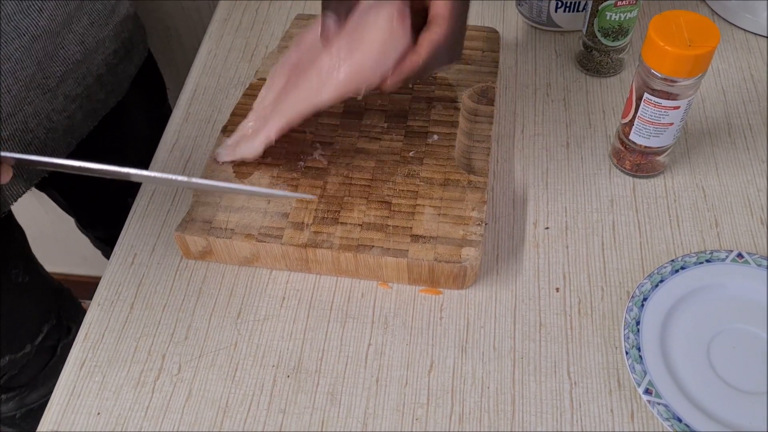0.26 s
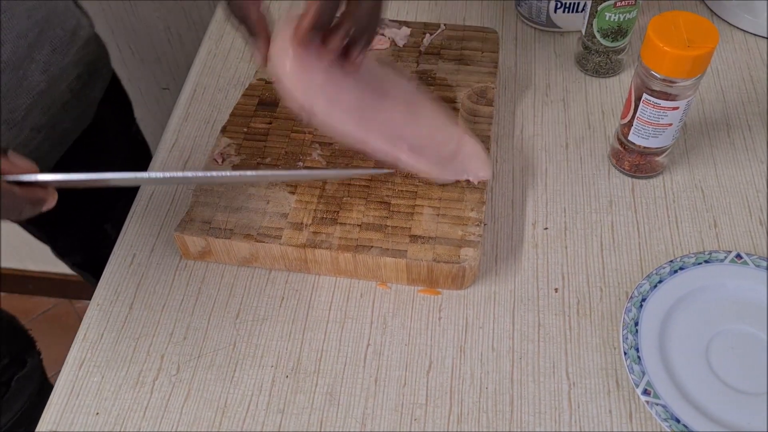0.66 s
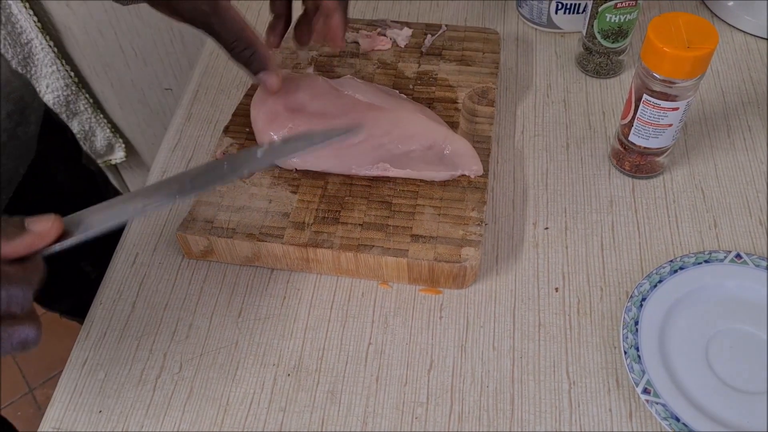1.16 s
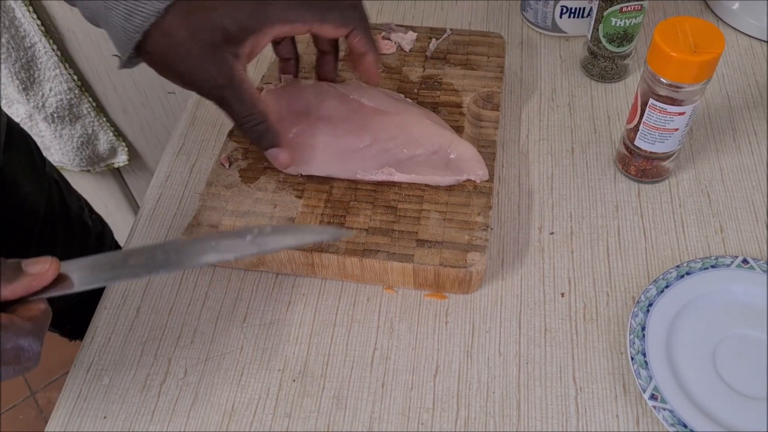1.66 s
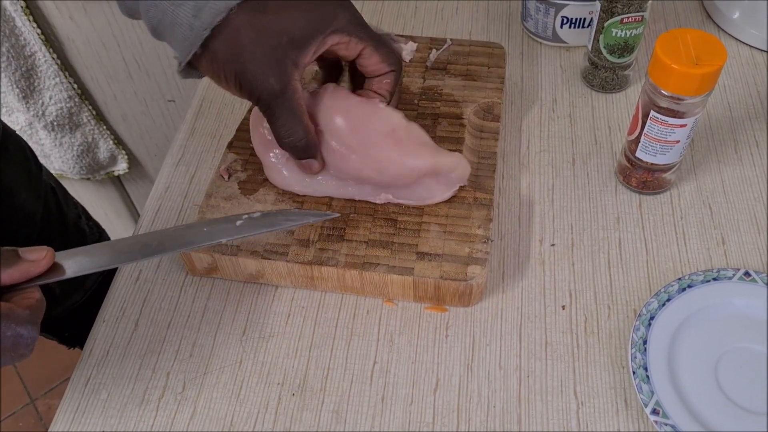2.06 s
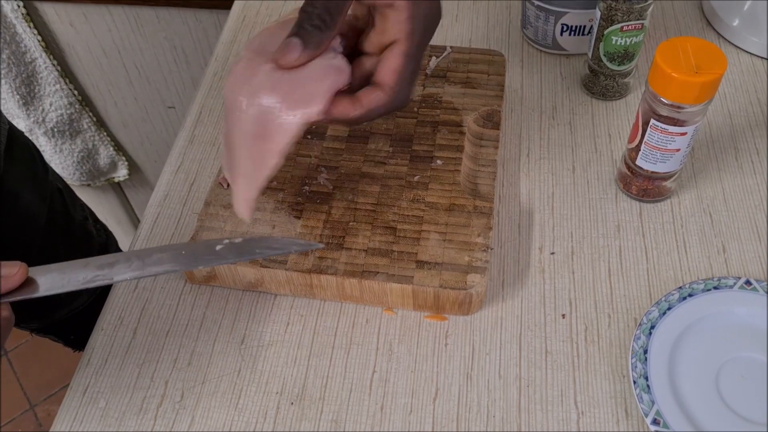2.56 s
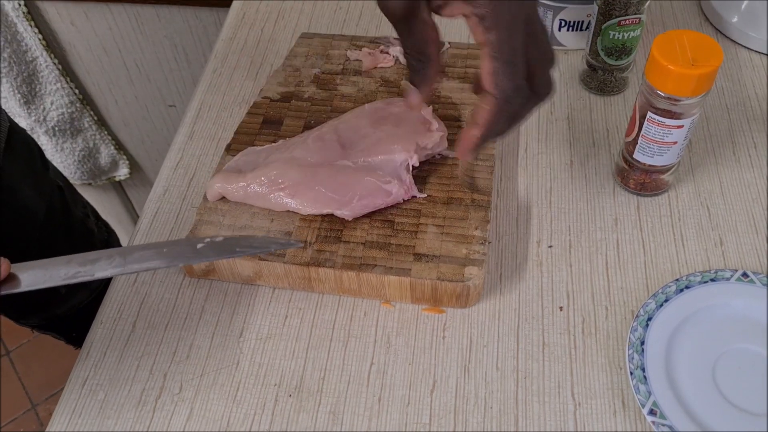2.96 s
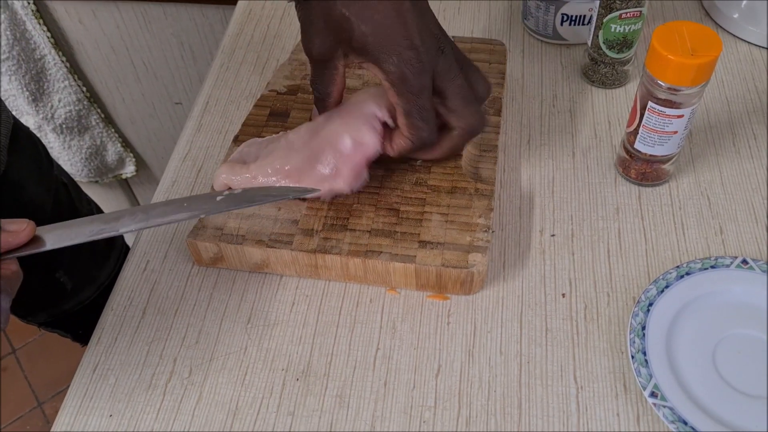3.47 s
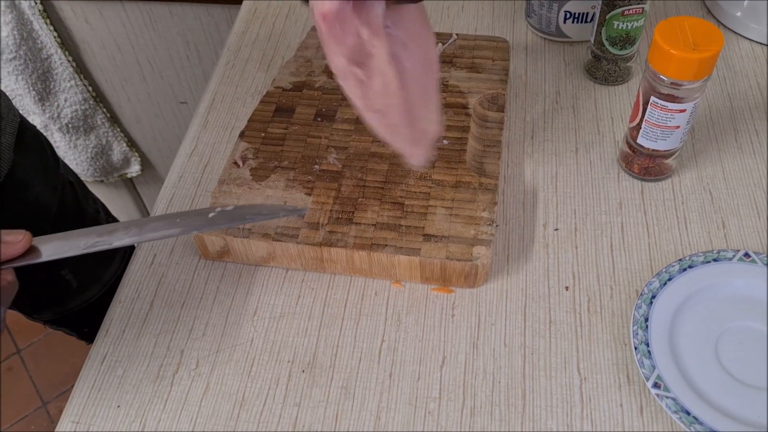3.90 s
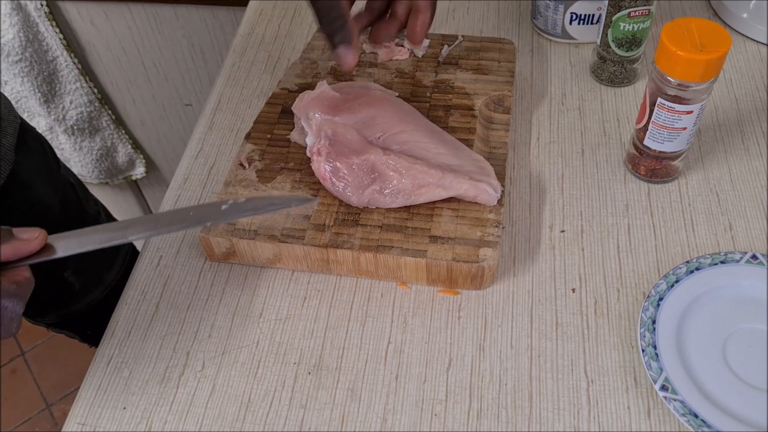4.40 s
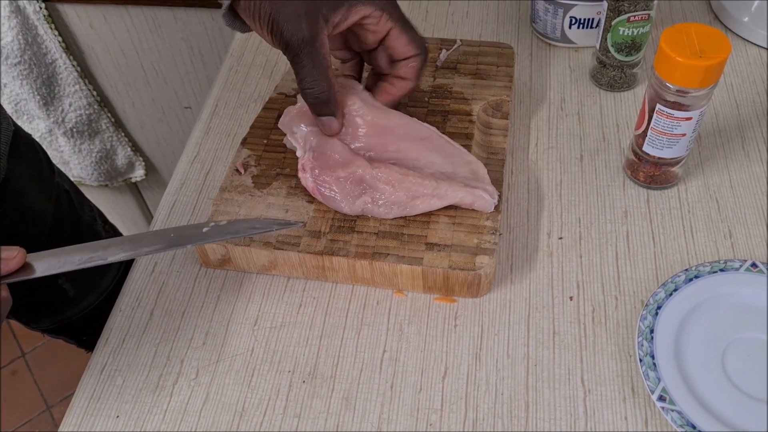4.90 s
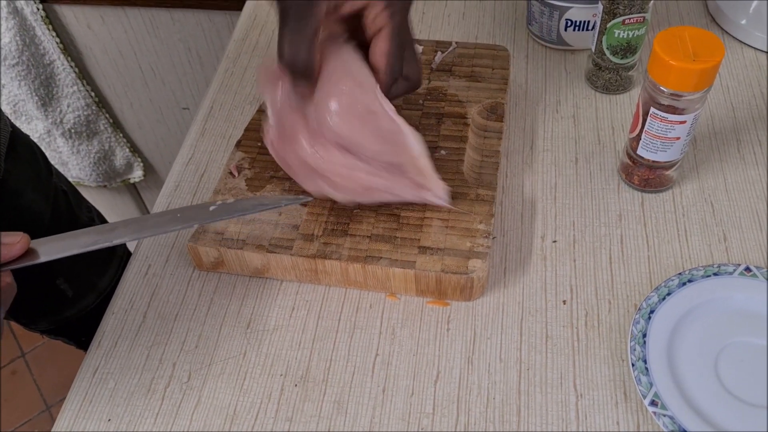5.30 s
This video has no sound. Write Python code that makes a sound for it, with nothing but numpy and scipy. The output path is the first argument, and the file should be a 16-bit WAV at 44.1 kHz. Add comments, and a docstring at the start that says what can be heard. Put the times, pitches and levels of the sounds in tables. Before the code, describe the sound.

A small kitchen with hard walls, heard close to a wooden board in stereo, over a faint low rumble and slight hiss. From 0 to 0.25 s raw chicken peels up with thin sticky crackles; a sleeve rustles softly until about 0.7 s, when the meat flops down with a small wet pat and a soft low table thud. At 1.06 s a knife gives a light dry tick, with fainter touches near 1.5 and 2.5 s. Wet films snap delicately around 1.9 to 2.8 s, with a muted bump near 2.84 s. Sticky crackling gathers from 3.3 to 3.7 s. At 4.06 s comes the one loud event: a hard, wet, popping slap with splashy spatter, woody knock, faint crockery ring, brief room reflection and a deep beating boom fading in under half a second. Afterwards there is a faint bump at 4.57 s, then tiny sticky clicks near 4.7 and 5.25 s.

```python
"""Raw chicken on a cutting board

Small kitchen, two microphones close to a wooden board where a raw chicken breast is turned over.
Wet films peel and snap in sticky noise bursts; the meat flops back as popping air, splashes and damped wood modes.
One hard slap rings the board and sets two beating table modes booming.
Around it cloth brushes, a knife ticks lightly, hard walls reflect and low filtered noise fills the room."""
import sys
import numpy as np
from scipy import signal
from scipy.fft import rfft, irfft, next_fast_len
from scipy.io import wavfile

SR = 44100
rng = np.random.default_rng(int(sys.argv[2]) if len(sys.argv) > 2 else 0)


def transcribe(signal):
    """Save signal, clipped to [-1, 1], as a 16-bit WAV file at the path in sys.argv[1]."""
    frames = np.atleast_2d(signal).T
    limited = np.clip(frames, -1, 1)
    pcm = np.round(limited * 32767).astype(np.int16)
    wavfile.write(sys.argv[1], SR, pcm)


N = 244660  # length [samples]
TOP_HZ = 16000  # upper edge of everything recorded


def amp(db):
    """Decibels to gain."""
    return 10 ** (np.asarray(db) / 20)


def seconds(length):
    """Time axis of a given length [s]."""
    return np.arange(int(length * SR)) / SR


def read(table, hz):
    """Value of a spectrum table on a log-frequency axis."""
    f, value = np.transpose(table)
    return np.interp(np.log(hz + 1), np.log(f), value)


def colour(x, table, tilt_db=0, tilt_from_hz=500):
    """Shape a sound by a spectrum and a tilt per octave; white noise keeps its power."""
    size = next_fast_len(x.shape[-1] + 2048)
    hz = np.arange(size // 2 + 1) * SR / size
    level_db = read(table, hz) + tilt_db * np.log2(hz + tilt_from_hz)
    gain = amp(level_db) / (1 + (hz / TOP_HZ) ** 20)
    gain_rms = np.sqrt(np.mean(gain ** 2))
    return irfft(rfft(x, size) * gain / gain_rms, size)[..., :x.shape[-1]]


def add(out, s, x):
    """Mix a sound in at a time [s]."""
    i = max(int(s * SR), 0)
    out[i:i + len(x)] += x[:len(out) - i]


def ring(t, hz, t60):
    """One damped mode, 60 dB down after t60 [s]."""
    return np.sin(2 * np.pi * hz * t) * amp(-60 * t / t60)


def modes(t, table):
    """Damped modes struck together, alternating in sign."""
    return sum((-1) ** k * amp(db) * ring(t, hz, t60) for k, (hz, db, t60) in enumerate(table))


def wander(count, points):
    """Random values joined by straight lines."""
    return np.interp(np.arange(count), np.linspace(0, count, num=points), rng.standard_normal(points))


def diffuse(count, apart_hz):
    """Stereo noise that is alike in the bass and unrelated in the treble."""
    mid, side = rfft(rng.standard_normal((2, count)))
    hz = np.arange(len(mid)) * SR / count
    alike = 1 / (1 + (hz / apart_hz) ** 2)
    sides = np.array([[1], [-1]]) * side * np.sqrt(1 - alike)
    return irfft(mid * np.sqrt(1 + alike) + sides, count) / np.sqrt(2)


# Wooden board lying on the table: (frequency [Hz], relative level [dB], decay by 60 dB [s])
BOARD_MODES = [(84.5, 2.5, 0.2), (116.1, -6, 0.18), (168, -3.5, .26), (197, -4.5, 0.19),
               (221.6, -2.5, 0.09), (281, -5, 0.22), (680, -13, .04), (835, 0, 0.05), (373, -20.5, 0.3),
               (1047, -6.5, 0.039), (1228, -6.5, 0.076), (1427, 5, .025), (1650, 2, 0.022),
               (2150, -1, .025), (2540, 2.5, 0.042), (2860, -3, 0.025), (3900, -14, 0.019)]


def board(t):
    """Damped modes of the wood after a sharp blow."""
    return modes(t, BOARD_MODES)


# Meat landing on the board:
# (time [s], level [dB], starting pop pitch [Hz], relative board level [dB], splash tilt [dB per octave])
SLAPS = [(0.7064, -32, 2410, -6, 2), (0.7167, -29, 1980, -10, 3.5), (0.7224, -34.5, 2210, -4, -2),
         (4.0621, -3, 1946, -5, -1), (4.0663, -14.5, 2730, -16, -1), (4.0698, -11, 1060, -4.5, -9),
         (4.081, -20.5, 1200, -6.5, -3.5)]
# Spectrum of the juice splash: (frequency [Hz], relative level [dB])
SPLASH_SPECTRUM = [(200, -14.5), (520, -16), (750, 2.5), (1100, 1.5), (1600, 0), (2400, 5), (3200, 3),
                   (3900, -4), (5000, 0.5), (6400, -7.5), (8000, -23), (10000, -22.5), (13000, -11.5),
                   (16000, -18)]
# Plate and jars on the table, ringing on: (frequency [Hz], relative level [dB], decay by 60 dB [s])
CROCKERY_MODES = [(831, -1, .25), (887, -5, .25), (1014, -7, .3), (1085, -6, .3), (1176, -3, .33),
                  (1365, -4, .28), (1467, -3, .33), (1617, 3, .3), (1780, 0, .25), (2735, -6, .22)]


def slaps(splash_s=0.0034, smear_s=0.018, smear_db=-13, splash_db=-5.0, board_db=-13,
          crockery_db=-32, pop_db=0.5, pop_t60_s=0.025, sag=0.13, sag_s=0.0075):
    """Trapped air pops and sags in pitch, wood and crockery ring, juice spatters.

    Gives the near sound and the crack sent to the walls."""
    near, crack, t = np.zeros(N), np.zeros(N), seconds(.4)
    wood = amp(board_db) * board(t) + amp(crockery_db) * modes(t, CROCKERY_MODES)
    attack = 1 - np.exp(-t / .0003)
    # the pop slows from its starting pitch to a share (1 - sag) of it
    sagging = t * (1 - sag) + sag * sag_s * (1 - np.exp(-t / sag_s))
    sheet = amp(splash_db) * np.exp(-t / splash_s)
    drops = amp(splash_db + smear_db) * np.exp(-t / smear_s)
    centre = len(t) // 2
    impulse = signal.unit_impulse(len(t), centre)
    for s, db, hz, wood_db, tilt_db in SLAPS:
        hiss, spatter = rng.standard_normal((2, len(t)))
        # cubing the noise leaves sparse, strong drops
        splash = colour(hiss * sheet + spatter ** 3 / 4 * drops, SPLASH_SPECTRUM, tilt_db)
        pop = amp(pop_db) * ring(sagging, hz, pop_t60_s)
        add(near, s, amp(db) * (pop + amp(wood_db) * wood + splash) * attack)
        # summed over all directions the splash is one even crack of the same energy
        even = np.linalg.norm(sheet + drops) * colour(impulse, SPLASH_SPECTRUM, tilt_db)
        add(crack, s - t[centre], amp(db) * even)
    return near, crack


# Weight settling on the board:
# (time [s], relative table boom [dB], relative board thump [dB], relative soft pat [dB], contact [s])
THUDS = [(.734, -52, -39.5, -38.5, 0.0057), (0.757, -18, -32, -76, 0.0053),
         (1.05, -44, -52.5, -47.5, 0.0037), (1.809, -40, -73, -72, 0.009),
         (2.113, -46.5, -49.5, -73, 0.0062), (2.765, -44, -52.5, -64, 0.0018),
         (2.838, -26, -44, -48, 0.0046), (2.847, -28.5, -48, -62, 0.007), (3.476, -54, -46.5, -52, 0.0046),
         (4.066, -7, -12, -25, 0.0027), (4.572, -36, -40.5, -78, 0.0071)]
# Spectrum of soft flesh on wood: (frequency [Hz], relative level [dB])
FLESH_SPECTRUM = [(80, -5.5), (200, -3), (350, 1), (540, 2), (800, -23.5), (1500, -21.5), (4000, -47),
                  (12000, -63)]


def thuds(thump_db=-6, pat_db=-4, pat_s=0.024):
    """The soft weight pats the wood; its smooth push mostly drives the low board modes."""
    out, t = np.zeros(N), seconds(.4)
    wood = amp(thump_db) * board(t)
    for s, _, wood_db, flesh_db, contact in THUDS:
        push = np.sin(np.pi * np.minimum(t / contact, 1)) ** 2
        thump = signal.fftconvolve(wood, push / push.sum())[:len(t)]
        pat = colour(rng.standard_normal(len(t)), FLESH_SPECTRUM)
        pat *= np.exp(-t / pat_s) * (1 - np.exp(-t / contact))
        add(out, s, amp(wood_db) * thump + amp(flesh_db + pat_db) * pat)
    return out


def table_boom(low_hz=47.56, high_hz=55.8, t60=0.36, boom_db=-4, rise_s=0.02, lag_s=.007):
    """Two close modes of the table swell and beat after each push of THUDS."""
    out, t = np.zeros(N), seconds(0.87)
    beating = ring(t, low_hz, t60) - ring(t, high_hz, t60)
    boom = amp(boom_db) * beating * (1 - np.exp(-t / rise_s))
    for s, db, *_ in THUDS:
        # the table gives way a little after the push
        add(out, s + lag_s, amp(db) * boom)
    return out


# Flesh pressed down: (time [s], level [dB], starting pitch [Hz], nominal decay by 60 dB [s])
BUMPS = [(.736, -35.5, 205.5, 0.09), (1.051, -39, 538, 0.047), (4.072, -16.5, 219.3, 0.057),
         (4.5707, -32.5, 197.5, 0.071)]


def bumps(attack_s=0.0028, sag_per_s=3.5):
    """Round, hollow bumps whose pitch sinks as the flesh spreads."""
    out, t = np.zeros(N), seconds(.15)
    sinking = np.log1p(sag_per_s * t) / sag_per_s
    for s, db, hz, t60 in BUMPS:
        add(out, s, amp(db) * ring(sinking, hz, t60) * (1 - np.exp(-t / attack_s)))
    return out


# Meat peeling off or spreading on the wood:
# (full strength time [s], build-up [s], release [s], relative level [dB], tilt [dB per octave])
PEELS = [(0.195, 0.22, 0.044, -59, 5), (.720, 0.033, 0.021, -40.5, -4.5), (1.925, 0.051, 0.059, -55, -0.5),
         (2.284, 0.03, 0.017, -52, 5), (3.36, 0.17, 0.18, -74, -2), (3.505, 0.06, 0.047, -55.5, 0),
         (3.662, .065, 0.024, -52, 4), (4.06, 0.018, .008, -36.5, -6.5), (4.685, 0.062, 0.051, -63, 0),
         (5.275, 0.13, 0.018, -58.5, 1.5)]
# Spectrum of wet films, for peels and snaps alike: (frequency [Hz], relative level [dB])
WET_SPECTRUM = [(300, -20.5), (1000, -10.5), (2000, -2.5), (3200, 0.5), (4500, 0.5), (5600, 5.5),
                (7300, 3.5), (9000, -10.5), (12500, -5), (16000, 0)]


def peeling(cycles=6, fits_db=2, peel_db=0, curve=1.3, grain_spread_db=3.2):
    """Dense tiny threads and bubbles burst, each a few cycles at its own pitch; the pull builds, then dies."""
    out, t = np.zeros(N), seconds(.002)
    for peak, build, release, db, tilt_db in PEELS:
        when, pitch, size = rng.random((3500, 3)).T[:, :, None]
        hz = 1200 + 14000 * pitch
        strength = amp(-grain_spread_db * np.log(size + 0.005)) * np.sqrt(hz)
        grains = strength * ring(t, hz, cycles / hz)
        # the bursts are scattered over 0.45 s
        places = (when * .45 * SR).astype(int) + np.arange(len(t))
        crackle = np.bincount(places.ravel(), grains.ravel())
        crackle = (crackle - crackle.mean()) / crackle.std()
        age = np.arange(len(crackle)) / SR
        grip = np.minimum(age / build, 1) ** curve * np.exp(-np.maximum(age - build, 0) / release)
        # the film lets go in fits
        grip *= amp(fits_db * wander(len(grip), 60))
        add(out, peak - build, amp(db + peel_db) * colour(crackle, WET_SPECTRUM, tilt_db) * grip)
    return out


# The largest wet films snapping:
# (time [s], relative level [dB], tilt [dB per octave], bubble pitch [Hz], decay to 1/e [s])
SNAPS = [(0.038, -54.5, 3, 7300, 0.0039), (.117, -70, 5, 6300, 0.0052), (0.181, -45, 10, 6670, 0.0091),
         (0.245, -47.5, -1.5, 5890, 0.005), (0.7004, -34, -3, 6900, 0.0018), (1.104, -52, -4, 8000, 0.0046),
         (1.890, -50, -5, 6100, .003), (1.915, -37.5, 0.5, 4800, 0.0071),
         (1.922, -40.5, -0.5, 5870, 0.0051), (2.083, -51, 0.5, 5130, 0.0082),
         (2.115, -43, 11, 9900, 0.0057), (2.2604, -48.5, -1.5, 5920, 0.0063),
         (2.2904, -41, 3, 4830, 0.0038), (2.456, -36.5, 16, 11100, 0.0017), (2.5904, -58, -2, 7300, 0.0058),
         (2.7654, -47, -2.5, 6670, 0.0052), (2.839, -50.5, -2.5, 5870, 0.0048),
         (3.289, -58, -1, 6430, 0.003), (3.3236, -54.5, -6.5, 5840, 0.0061), (3.35, -67, -13, 5570, 0.0046),
         (3.392, -58.5, -3, 5200, .005), (3.475, -44, 3, 6500, .002), (3.491, -34.5, 6.5, 5600, .003),
         (3.521, -45, 1, 7200, .002), (3.5264, -44, 6, 7040, 0.0037), (3.5707, -47, 4, 6450, 0.0023),
         (3.592, -47.5, -1.5, 5700, 0.0039), (3.6177, -39, 11, 6990, 0.0022), (3.655, -43, 12, 6370, 0.004),
         (3.66, -36.5, 8, 5960, .003), (4.6262, -47, -3.5, 5960, 0.0045), (4.6754, -46.5, 4, 6000, 0.005),
         (4.715, -54.5, -1, 7000, 0.0077), (5.224, -49, 13, 6500, 0.0056), (5.2691, -50, 7, 6040, 0.013)]


def snaps(after_s=0.0093, after_db=-13, snap_db=-2.0, rise_s=0.00048, bubble_db=-9):
    """Each film breaks with a noise tick, a tiny bubble of its own pitch and smaller ticks behind it."""
    out, t = np.zeros(N), seconds(.06)
    rise = 1 - np.exp(-t / rise_s)
    for s, db, tilt_db, hz, decay in SNAPS:
        tick, after = rng.standard_normal((2, len(t)))
        bubble = amp(bubble_db) * np.sin(2 * np.pi * hz * t)
        burst = (tick + bubble) * np.exp(-t / decay)
        after_ticks = after * np.abs(after) / 2 * np.exp(-t / min(after_s, 2 * decay))
        burst += amp(after_db) * after_ticks
        add(out, s, amp(db + snap_db) * colour(burst * rise, WET_SPECTRUM, tilt_db))
    return out


# Light touches of the knife: (time [s], relative level [dB], tick pitch [Hz],
# tick decay by 60 dB [s], relative scrape [dB], relative blade ring [dB])
TAPS = [(1.0572, -22.5, 2150, 0.0079, -29, -2.5), (1.083, -42, 1880, 0.0075, -10, -3),
        (1.084, -48, 2890, 0.027, -2, 2), (1.487, -53, 1130, 0.039, 9.5, 2),
        (2.457, -50.5, 1823, 0.024, 12.5, -10)]
# The blade after a touch: (frequency [Hz], relative level [dB], decay by 60 dB [s])
BLADE_MODES = [(1965, -13, 0.039), (2884, -36, 0.09)]
# Spectrum of the touches: (frequency [Hz], relative level [dB])
TICK_SPECTRUM = [(300, -3), (900, -0.5), (2200, -4), (3200, 7), (4500, -13), (7000, -34), (16000, -32)]


def taps(scrape_s=0.0017, attack_s=0.00044, tap_db=-7):
    """The knife touches something lightly: a dry tick, a brief noise scrape and the blade's damped modes."""
    out, t = np.zeros(N), seconds(.12)
    blade = modes(t, BLADE_MODES)
    for s, db, hz, t60, scrape_db, blade_db in TAPS:
        scrape = rng.standard_normal(len(t)) * np.exp(-t / scrape_s)
        touch = ring(t, hz, t60) + amp(scrape_db) * scrape + amp(blade_db) * blade
        add(out, s, amp(db + tap_db) * touch * (1 - np.exp(-t / attack_s)))
    return colour(out, TICK_SPECTRUM)


# Sleeve and hand moving: (strongest time [s], width at 1/e [s], relative level [dB])
RUSTLES = [(.19, 0.05, -52.5), (.33, 0.05, -54.5), (.41, 0.047, -50), (.507, 0.076, -47.5),
           (.62, 0.16, -56), (1.03, 0.28, -55), (2.05, 0.12, -63.5), (2.29, 0.055, -65.5),
           (2.87, 0.085, -60.5), (3.42, 0.16, -63.5)]
# Spectrum of the cloth: (frequency [Hz], relative level [dB])
CLOTH_SPECTRUM = [(100, 8.5), (200, 8.5), (400, 16.5), (550, 6), (800, 8.5), (1500, -1), (3200, 1),
                  (7000, -5), (12000, -51)]


def rustling(flutter_db=4, cloth_db=-8):
    """Cloth brushes unevenly as the arm moves: noise under swells that rise and fade alike."""
    t = np.arange(N) / SR
    swells = sum(amp(db) * np.exp(-2 * np.abs(t - s) / width) for s, width, db in RUSTLES)
    flutter = amp(flutter_db * wander(N, 300) + cloth_db)
    return colour(rng.standard_normal(N), CLOTH_SPECTRUM) * swells * flutter


# Decay of the kitchen: (frequency [Hz], decay by 60 dB [s])
ROOM_T60 = [(100, 0.32), (500, 0.39), (1500, 0.36), (3000, 0.35), (6000, 0.31), (13000, 0.25)]
# Spectrum of the reflections: (frequency [Hz], relative level [dB])
ROOM_SPECTRUM = [(50, -13), (150, 0), (300, -3.5), (550, -5.5), (900, -0.5), (1800, -2), (3000, -2.5),
                 (5000, -10), (9000, 4.5), (16000, -2.5)]


def kitchen(x, gap_s=0.0013, build_s=0.0031, room_db=-7, bow=1.22):
    """Close hard walls: dense reflections hold up briefly, then fall away, the high treble fastest."""
    t = seconds(.6)
    hz, at, cells = signal.stft(diffuse(len(t), apart_hz=650), SR, nperseg=256)
    # a bow above 1 makes the decay slow at first, steeper later
    decay = amp(-60 * (at / read(ROOM_T60, hz)[:, None]) ** bow)
    tail = signal.istft(cells * decay, SR)[1][:, :len(t)]
    tail = colour(tail, ROOM_SPECTRUM) * (1 - np.exp(-np.maximum(t - gap_s, 0) / build_s))
    tail *= amp(room_db) / np.sqrt(np.sum(tail ** 2) / 2)
    return signal.fftconvolve(x[None], tail, axes=1)[:, :N]


# Right microphone against the left: (frequency [Hz], level difference of the direct sound [dB])
RIGHT_MINUS_LEFT = [(100, 4.5), (400, 3), (1500, 2.5), (3000, -1), (4200, 10.5), (6200, 6.5), (8500, 2.5),
                    (12500, 12)]


def microphones(x, reflected, right_lag_s=0.00011, shade=0.17, bounce=0.3):
    """The left microphone hears the board first, the right one brighter; reflections are more even."""
    size = next_fast_len(N, True)
    hz = np.arange(size // 2 + 1) * SR / size
    lean_db = np.array([[-.5], [.5]]) * read(RIGHT_MINUS_LEFT, hz)
    direct = np.exp(-2j * np.pi * hz * np.array([[0], [right_lag_s]]))
    # treble also glances off the table top and reaches each microphone by its own path
    glance = np.exp(-2j * np.pi * hz * np.array([[.0011], [.0018]])) * hz / (hz + 4000)
    near = rfft(x, size) * (direct + bounce * glance) * amp(lean_db)
    far = rfft(reflected, size) * amp(shade * lean_db)
    return irfft(near + far, size)[:, :N]


# Spectrum of the idle room: (frequency [Hz], relative level [dB])
AIR_SPECTRUM = [(15, -45), (25, -19), (59, 2.5), (114, -19.5), (141, -25.5), (195, -18.5), (229, -22.5),
                (405, -24.5), (840, -34), (1000, -24), (1500, -25), (1900, -22), (3250, -34), (6920, -36),
                (8830, -54.5), (16000, -44)]


def room_noise(air_db=-60, waver_db=.5):
    """Low rumble and a faint hiss from filtered stereo noise, wavering slightly in level."""
    level_db = air_db + waver_db * wander(N, 20)
    return colour(diffuse(N, apart_hz=352), AIR_SPECTRUM) * amp(level_db)


def scene(tap_room_db=-8, slap_room_db=-9, crack_room_db=1, snap_room_db=-5, peel_room_db=-3):
    """Everything on the board, heard in the kitchen; each source sends its own share to the walls."""
    slap, crack = slaps()
    sources = [(slap, slap_room_db), (thuds() + bumps() + rustling(), 0), (peeling(), peel_room_db),
               (snaps(), snap_room_db), (taps(), tap_room_db)]
    near = sum(x for x, _ in sources)
    to_walls = sum(amp(db) * x for x, db in sources) + amp(crack_room_db) * crack
    return microphones(near, kitchen(to_walls)) + table_boom() + room_noise()


def record(dry):
    """The recorder clips at full scale, then cuts the deepest bass and the top."""
    bass_cut = signal.butter(2, 24, "highpass", fs=SR, output="sos")
    top_cut = signal.ellip(10, .2, 70, TOP_HZ, fs=SR, output="sos")
    held = signal.sosfilt(bass_cut, np.clip(dry, -1, 1))
    return signal.sosfilt(top_cut, held)


dry = scene()
out = record(dry)
transcribe(out)
```